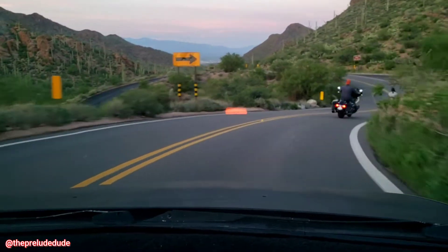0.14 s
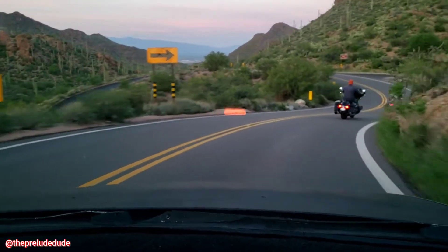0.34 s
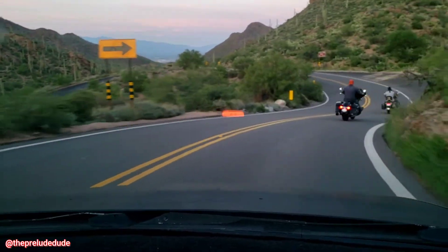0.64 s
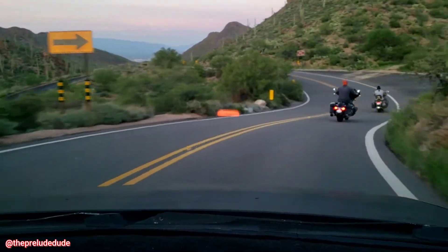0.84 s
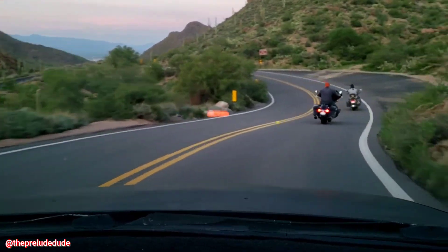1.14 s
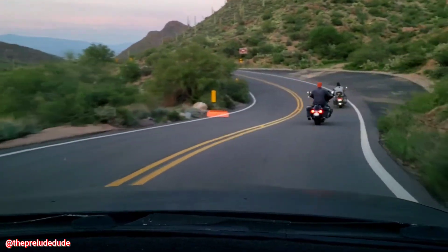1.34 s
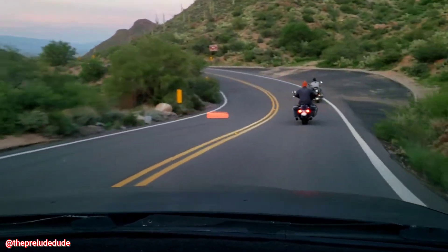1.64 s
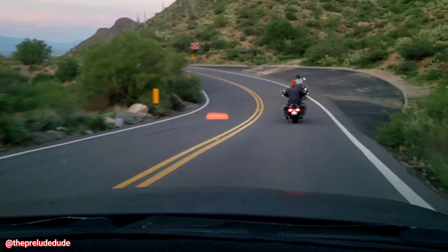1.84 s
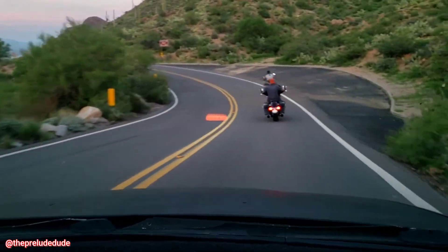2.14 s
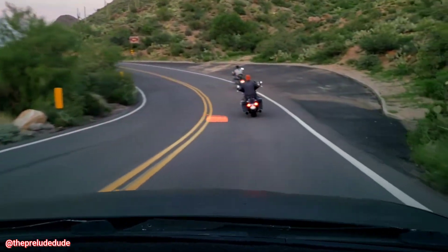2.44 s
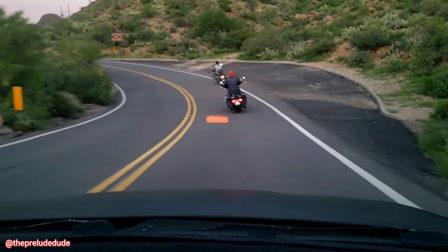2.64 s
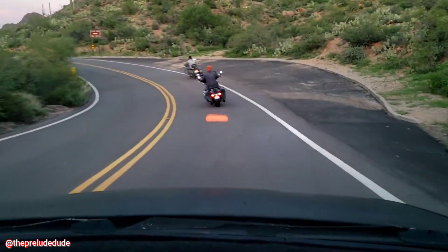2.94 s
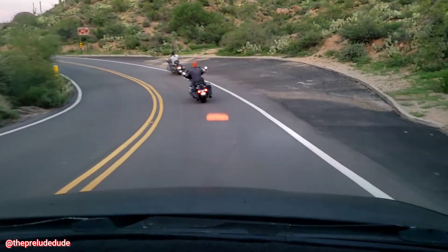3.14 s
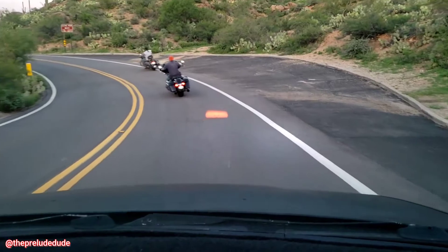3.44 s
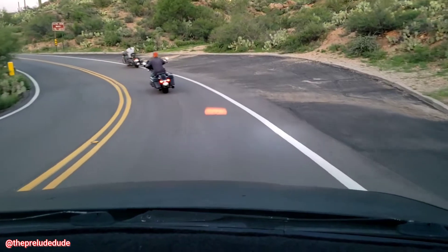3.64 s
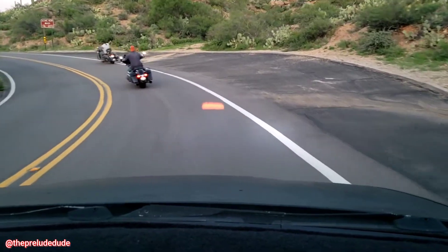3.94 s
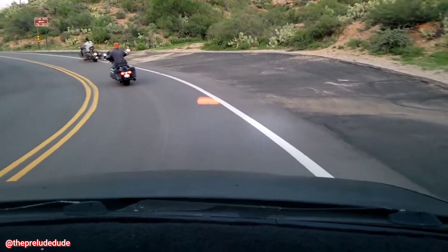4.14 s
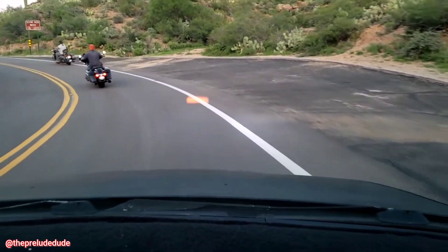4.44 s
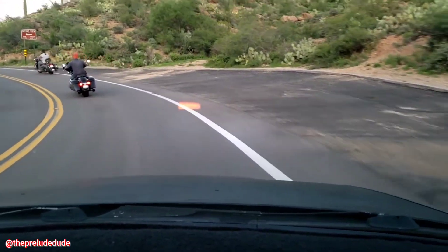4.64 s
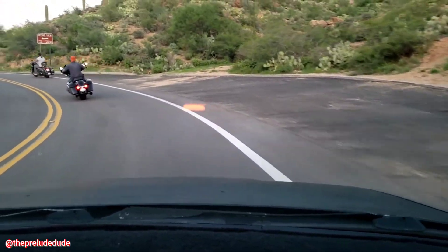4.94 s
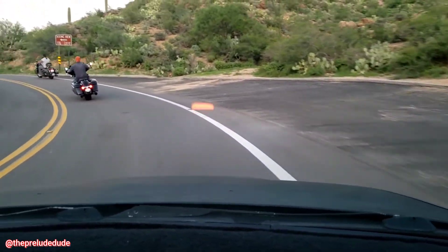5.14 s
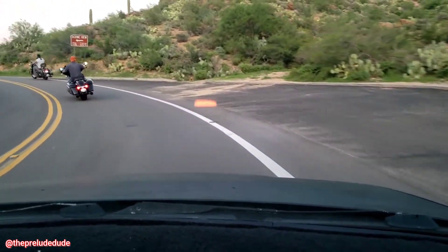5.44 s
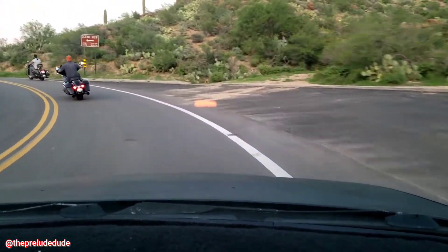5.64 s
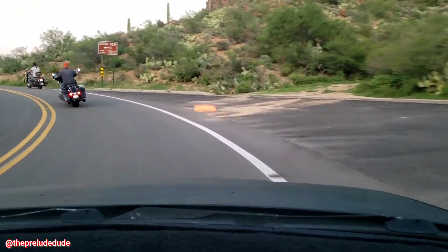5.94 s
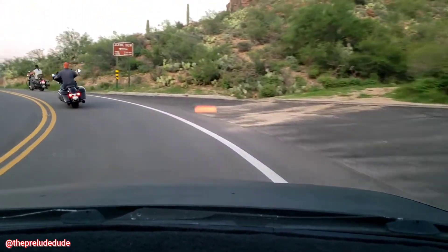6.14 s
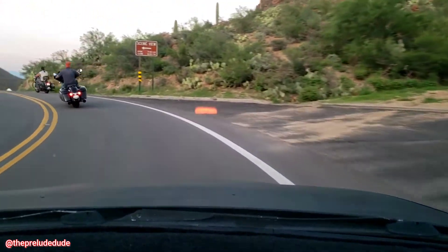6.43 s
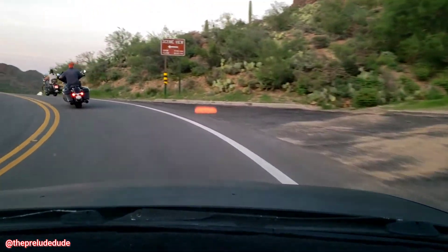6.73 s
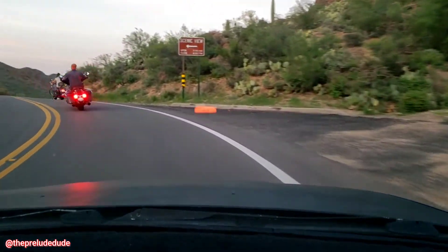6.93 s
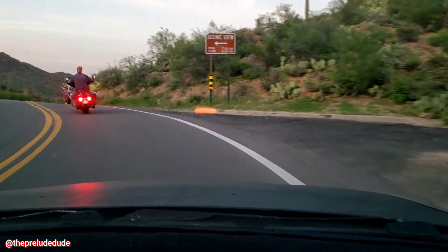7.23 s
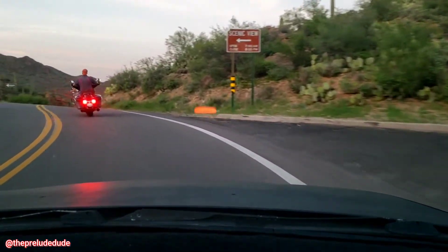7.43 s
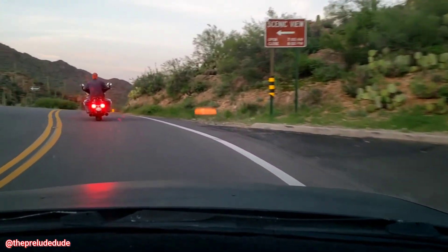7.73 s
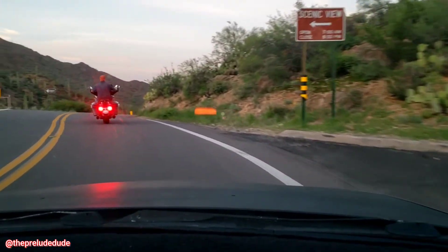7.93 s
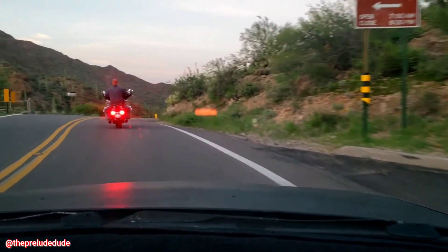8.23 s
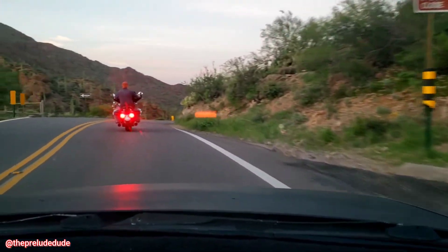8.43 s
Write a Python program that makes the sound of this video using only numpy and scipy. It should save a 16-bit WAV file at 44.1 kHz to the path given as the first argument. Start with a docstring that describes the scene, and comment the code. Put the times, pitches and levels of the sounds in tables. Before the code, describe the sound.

Heard from the dashboard of a moving car, a deep engine boom swells and eases as the car slows, picks up a little and slows again. Under it run steady road rumble, tyre roar and a soft rush of air. Two motorcycles drone faintly ahead, blending into the low sound, while plastic trim gives a few small ticks and squeaks.

```python
"""Inside a four-cylinder car that rolls through mountain bends, slowing and picking up again.
The exhaust booms at the firing rate, and its upper harmonics growl as they slide through resonances.
Under it lies a bed of road rumble, tyre roar, tyre hum and rushing air. Two motorcycles drone ahead.
Plastic trim ticks and squeaks, grit crackles, a small bird chirps faintly and a thin whine creeps in."""
import sys
import numpy as np
from scipy import signal
from scipy.fft import rfft, irfft, next_fast_len
from scipy.io import wavfile
from scipy.ndimage import uniform_filter1d

SR = 44100
rng = np.random.default_rng(int(sys.argv[2]) if len(sys.argv) > 2 else 0)


def to_wav(s):
    """Save 16-bit WAV."""
    ch = np.atleast_2d(s).T  # columns
    pcm = np.round(np.clip(ch, -1, 1) * 32767)  # PCM
    wavfile.write(sys.argv[1], SR, pcm.astype(np.int16))


N = 378372
TIME = np.arange(N) / SR


def undb(db):
    """Decibels to gain."""
    return 10 ** (np.asarray(db) / 20)


def unit(x):
    """Scale to an rms of one."""
    return x / np.sqrt(np.mean(x ** 2))


def curves(table):
    """One automation curve for each column after the time, in straight lines."""
    times, *columns = np.transpose(table)
    return [np.interp(TIME, times, column) for column in columns]


def ramp(start, length):
    """Fade from zero to one over length seconds."""
    return np.clip((TIME - start) / length, 0, 1)


def swell(start, length):
    """One rounded rise and fall."""
    return np.sin(np.pi * ramp(start, length))


def noise():
    """White noise."""
    return rng.standard_normal(N)


def wander(rate):
    """Smooth random modulation at an rms of one, with rate new values a second."""
    hold = max(int(SR / rate), 1)
    steps = rng.standard_normal(2048)[np.arange(N) // hold % 2048]
    return unit(uniform_filter1d(uniform_filter1d(steps, hold), hold))


def equalise(x, points):
    """Shape a sound with an EQ curve that falls 20 dB an octave past its ends; rms one."""
    hz, db = np.transpose(points)
    size = next_fast_len(N)
    bins = np.maximum(np.fft.rfftfreq(size, 1 / SR), 1)
    octaves_outside = np.maximum(np.log2(bins / hz[-1]), 0) + np.maximum(np.log2(hz[0] / bins), 0)
    gain = undb(np.interp(np.log(bins), np.log(hz), db) - 20 * octaves_outside)
    return unit(irfft(rfft(x, size) * gain, size)[:N])


def phase_of(hz):
    """Running phase of a gliding pitch."""
    return 2 * np.pi * np.cumsum(hz) / SR


def partial(phase, rough, rate):
    """A tone of rms near one whose strength and timing shake by the share rough."""
    tone = (1 + rough * wander(rate)) * np.cos(phase)
    jitter = rough * wander(rate) * np.sin(phase)
    return np.sqrt(2 / (1 + 2 * rough ** 2)) * (tone + jitter)


def resonance(x, hz, width):
    """One mode, gain one at its centre."""
    return signal.lfilter(*signal.iirpeak(hz, hz / width, fs=SR), x)


def add(out, start, sound):
    """Mix a short sound in at start seconds."""
    first = int(start * SR)
    out[first:first + len(sound)] += sound[:N - first]


# cabin and panel resonances: (centre [Hz], width [Hz], level against the direct sound [dB])
CABIN_MODES = [(411, 38, 3.5), (560, 58, -0.5), (605, 59, 0.5), (744, 16, -10.5), (985, 76, -9),
               (1065, 58, 3.5), (1204, 55, 1.5), (1369, 22, 0), (1495, 60, -5), (1693, 46, -3),
               (1877, 66, -1.5), (2015, 28, -0.5), (2570, 150, -10.5), (2920, 150, -13), (3570, 130, -6),
               (3940, 100, -11), (4170, 49, -5.5)]
def cabin(x):
    """The resonances of the cabin colour whatever passes through; rms one."""
    return unit(x + sum(undb(db) * resonance(x, hz, width) for hz, width, db in CABIN_MODES))


def whine(hz=3600, level_db=-84.5):
    """A thin, unsteady tone fades in late, barely there."""
    fade_in = ramp(start=5.79, length=.5)
    return undb(level_db) * fade_in * partial(2 * np.pi * hz * TIME, rough=.6, rate=45)


# roadside bird calls: (time [s], level [dB])
BIRD_CALLS = [(4.703, -75), (5.075, -73), (5.405, -71), (5.713, -63.5)]
def bird(top_hz=5030, fall_hz=280, spread_hz=35, length_s=0.0228, spacing_s=.039):
    """Three quick arched whistles a call, each peaking early at a slightly different pitch."""
    out = np.zeros(N)
    along = np.linspace(0, 1, int(length_s * SR))
    arch_hz = top_hz - fall_hz * ((3 * along - 1) / 2) ** 2
    envelope = np.sin(np.pi * along)
    for start, db in BIRD_CALLS:
        for chirp in range(3):
            hz = arch_hz + spread_hz * rng.standard_normal()
            add(out, start + chirp * spacing_s, undb(db) * envelope * np.sin(phase_of(hz)))
    return out


# crisp crunch of loose stones: (frequency [Hz], gain [dB])
GRIT_EQ = [(1800, -12), (2600, 4), (4200, 1), (5500, -10)]
def grit(level_db=-76, grains_per_s=260, scatter_db=4):
    """Small stones crackle under the treads beside a lay-by."""
    hits = rng.random(N) < grains_per_s / SR
    grains = hits * undb(scatter_db * noise()) * np.sign(noise())
    gate = ramp(start=3.95, length=0.18) * (1 - ramp(start=5.9, length=0.18))
    return undb(level_db) * gate * cabin(equalise(grains, GRIT_EQ))


# trim squeaks: (time [s], pitch [Hz], length [s], level [dB])
SQUEAKS = [(3.402, 6660, 0.048, -75), (5.17, 6150, .1, -78), (7.219, 2980, 0.064, -67),
           (7.255, 2000, .035, -59), (7.34, 3000, 0.038, -71)]
# trim rustles: (time [s], length [s], level [dB])
RUSTLES = [(2.72, .09, -70), (2.797, .06, -73), (4.4, .035, -79), (4.48, .035, -77), (4.55, .04, -80),
           (6.045, .45, -73), (6.695, .35, -76), (7.25, .14, -71)]
# their thin, bright top: (frequency [Hz], gain [dB])
RUSTLE_EQ = [(7000, -13), (10500, -5.5), (13000, -1), (15500, -3)]
def trim_creaks(width_hz=400):
    """Trim rubs as the body flexes: narrow, scratchy squeaks and thin rustles."""
    squeaks = np.zeros(N)
    for start, hz, length, db in SQUEAKS:
        band = resonance(noise(), hz, width_hz)
        squeaks += undb(db) * swell(start, length) * unit(resonance(band, hz, width_hz))
    rubbing = sum(undb(db) * swell(start, length) for start, length, db in RUSTLES)
    friction = noise() * undb(1.5 * wander(120))
    return squeaks + rubbing * equalise(friction, RUSTLE_EQ)


# trim slips: (time [s], relative level [dB], time to fall 60 dB [s], hardness as treble gain [dB])
TICKS = [(1.547, -38, 0.032, 3), (1.93, -33, 0.03, -7), (3.205, -29.5, 0.08, -22), (3.209, -43, 0.13, -1.5),
         (3.228, -49, 0.07, 2), (3.775, -49, .03, 7.5), (4.029, -42, 0.045, -2), (4.324, -45, 0.033, -1),
         (4.855, -43, .035, 2), (4.945, -49, 0.039, 7), (5.134, -46, 0.039, 6), (5.189, -40, 0.035, 1),
         (6.548, -44, 0.029, 4), (6.684, -42, 0.041, 10), (6.812, -39, .05, 2), (7.147, -43, 0.026, 6),
         (7.785, -46, 0.1, 8.5)]
# ring of the plastic: (centre [Hz], width [Hz], gain [dB])
PLASTIC_MODES = [(1200, 220, 1.5), (1620, 210, 6), (2665, 260, -4.5), (3660, 270, -1.5), (4400, 670, -7.5),
                 (7900, 3500, -15)]
def trim_ticks(gain_db=-8, treble_hz=2500, lowpass_hz=9000):
    """Plastic panels slip: a short scrape rings their modes, the high ones more when it is hard."""
    out = np.zeros(N)
    age = TIME[:SR // 4]
    lowpass = signal.butter(2, lowpass_hz, fs=SR)
    for start, db, decay_s, hard_db in TICKS:
        scrape = signal.lfilter(*lowpass, rng.standard_normal(len(age)))
        slip = undb(db + gain_db) * scrape * undb(-60 * age / decay_s)
        for hz, width, mode_db in PLASTIC_MODES:
            gain = undb(mode_db + hard_db * (hz > treble_hz))
            add(out, start, gain * resonance(slip, hz, width))
    return out


# fader rides for air flow and road contact: (time [s], air fader [dB], roar fader [dB])
ROAD_FADERS = [(0, -50.5, -45.5), (0.6, -54.5, -48.5), (1, -57.5, -50.5), (2.1, -59.5, -51.5),
               (2.6, -63, -54), (2.9, -63.5, -55), (3.17, -64, -53.5), (3.45, -67.5, -58.5),
               (3.7, -66, -55.5), (4.1, -66, -55), (5.2, -65, -54.5), (6.1, -63.5, -54),
               (6.85, -60.5, -51.5), (7.35, -60.5, -52), (8.05, -65.6, -54), (8.54, -68, -59.5)]
# body of the air rush: (frequency [Hz], gain [dB])
RUSH_EQ = [(1200, -20), (2200, 3), (2900, -0.5), (3700, -1), (4500, -4.5), (5100, -4.5), (5800, -13.5),
           (7000, -12.5), (10000, -36.5)]
# hiss on top of it: (frequency [Hz], gain [dB])
HISS_EQ = [(3500, -24), (5500, -2.5), (7000, -3), (7600, 1), (9000, 0.5), (12000, -0.5), (13500, -3),
           (15500, -5)]
def air(rush_gain_db=-4, hiss_gain_db=-8):
    """Air rushes past the window and flutters; fine road grit roughens the rush."""
    air_db, _ = curves(ROAD_FADERS)
    flutter = wander(22)
    grainy = noise() * undb(0.72 * wander(200))
    rush = undb(air_db + rush_gain_db + 0.65 * flutter) * cabin(equalise(grainy, RUSH_EQ))
    hiss_db = air_db + hiss_gain_db + .5 * flutter + 0.35 * wander(30)
    return rush + undb(hiss_db) * equalise(noise(), HISS_EQ)


# midrange roar of tread on asphalt: (frequency [Hz], gain [dB])
ROAR_EQ = [(150, -11.5), (300, 6.5), (450, 1), (600, -2.5), (720, -2.5), (900, -0.5), (1000, -12),
           (1500, -8.5), (1950, -14), (2400, -23.5), (4000, -36)]
def tyre_roar(gain_db=3):
    """The treads roar on the road, heard through the cabin's resonances."""
    _, roar_db = curves(ROAD_FADERS)
    return undb(roar_db + gain_db + 0.63 * wander(14)) * cabin(equalise(noise(), ROAR_EQ))


def tyre_hum(cruise_hum_hz=255.4, cruise_firing_hz=67.5, loud_hum_db=-46, loud_boom_db=-17.5):
    """The tyres hum at a pitch that follows speed, swelling with the exhaust boom."""
    firing_hz, = curves(FIRING_RATE)
    boom_db, = curves(BOOM_LEVEL)
    hum_hz = cruise_hum_hz + 1.05 * (firing_hz - cruise_firing_hz)
    hum_db = loud_hum_db + 0.47 * (boom_db - loud_boom_db)
    return undb(hum_db) * partial(phase_of(hum_hz), rough=0.12, rate=8)


# two motorcycles ahead, faint through the windscreen: (time [s], pitch [Hz], level [dB])
NEAR_BIKE = [(1.5, 69.9, -72), (2.7, 66.5, -55), (4, 61.65, -44), (5, 58.64, -43.5), (5.6, 56.68, -45.5),
             (6.8, 55.96, -46.5), (7.5, 55.15, -47.5), (8.58, 54.8, -49.5)]
FAR_BIKE = [(1, 65, -66), (2.5, 60.2, -48), (3.3, 57.05, -48.5), (4.5, 53.42, -49.5), (5.3, 52.4, -73)]
# their exhaust tone: (harmonic [x pitch], relative level [dB])
BIKE_HARMONICS = [(1, 7.5), (2, -11), (3, -4.5), (4, -5), (5, -9), (7, -4)]
def motorcycle(ride):
    """A bike's drone sinks as it slows for the bend; its lowest note beats against the boom."""
    hz, level_db = curves(ride)
    phase = phase_of(hz)
    drone = sum(undb(db) * partial(k * phase, rough=0.22, rate=11) for k, db in BIKE_HARMONICS)
    return undb(level_db) * unit(drone)


# deep rumble of the cabin: (frequency [Hz], gain [dB])
RUMBLE_EQ = [(15, -20.5), (30, -17.5), (42, -6.5), (54, 0.5), (65, 0.5), (76, -3.5), (88, 5), (100, -9.5),
             (120, -24.5), (160, -33.5), (300, -57.5)]
# low-mid shudder of the body panels: (frequency [Hz], gain [dB])
PANEL_EQ = [(70, -25), (110, 1), (150, 4.5), (195, -5.5), (245, 2), (310, -1.5), (420, -10), (520, -13),
            (620, -18.5), (800, -22), (1500, -57.5)]
def road_rumble(smooth_db=-36, rough_boost_db=3.5, cruise_panel_db=-45, cruise_roar_db=-53.5):
    """Asphalt shakes the body, harder once it turns rough; the panels follow the tyre roar."""
    _, roar_db = curves(ROAD_FADERS)
    rough_road = ramp(start=5.11, length=0.95)
    rumble = undb(smooth_db + rough_boost_db * rough_road) * equalise(noise(), RUMBLE_EQ)
    panel_db = cruise_panel_db + .5 * (roar_db - cruise_roar_db) + 0.79 * wander(6.5)
    return rumble + undb(panel_db) * equalise(noise(), PANEL_EQ)


def overtone(hz, modes, floor_db, rough, rate):
    """A shaky harmonic that flares above floor_db as its pitch slides through resonances."""
    peaks = [undb(db) / (1 + (2 * (hz - centre) / width) ** 2) for centre, width, db in modes]
    gain = np.sqrt(undb(floor_db) ** 2 + sum(peak ** 2 for peak in peaks))
    return gain * partial(phase_of(hz) + rng.uniform(0, 2 * np.pi), rough, rate)


# growl harmonics, the halves from the crank turn: (order [x firing rate], relative level [dB])
GROWL_ORDERS = [(3.5, -6), (4, 1.5), (4.5, -4.5), (5, -3), (5.5, -9.5), (6, 0.5), (6.5, -9), (7, -4),
                (8, -7), (9, -13.5), (10, -16), (12, -18.5)]
# fader ride of the growl, dying away as the car coasts: (time [s], level [dB])
GROWL_FADER = [(0, -57), (0.2, -54.5), (0.58, -50.5), (0.95, -57.5), (1.3, -52.5), (1.6, -53.5),
               (1.85, -59.5), (2.12, -56), (2.6, -63), (3.15, -58), (4.0, -61), (4.6, -68), (5.5, -66.5),
               (6.8, -60.5), (7.6, -66.5), (8.58, -69)]
# panel resonances that make it flare: (centre [Hz], width [Hz], peak against the floor [dB])
GROWL_MODES = [(286.4, 22, 8), (346, 16, 2), (386.3, 13, 5), (406, 24, 8.5), (429, 13, 5.5), (475.8, 9, 6),
               (511, 11, 5), (533.7, 17, 4), (609.5, 16, 10.5)]
def engine_growl(flicker_db=1.87):
    """Uneven combustion shakes the higher orders, which light up as they cross panel resonances."""
    firing_hz, = curves(FIRING_RATE)
    fader_db, = curves(GROWL_FADER)
    growl = np.zeros(N)
    for order, db in GROWL_ORDERS:
        gain = undb(db + flicker_db * wander(6))
        growl += gain * overtone(order * firing_hz, GROWL_MODES, floor_db=0, rough=0.38, rate=26)
    return undb(fader_db) * growl


# engine speed: (time [s], firing rate [Hz])
FIRING_RATE = [(0, 90.2), (.5, 86.1), (1, 81.4), (1.5, 77.1), (2, 72.7), (2.8, 66.5), (4, 69.5),
               (5.3, 74.3), (6, 75.4), (6.8, 75.5), (7.5, 72.5), (8.58, 65.4)]
# weight of the boom, following the throttle: (time [s], level [dB])
BOOM_LEVEL = [(0, -31.5), (0.35, -22), (0.8, -22), (0.94, -31.5), (1.22, -34.5), (1.4, -28), (1.95, -25),
              (2.33, -18.5), (2.93, -20.5), (3.94, -18), (4.08, -24.5), (4.28, -22), (4.45, -29.5),
              (5.3, -31.5), (6.35, -31.5), (7.05, -24), (8.15, -19), (8.58, -21)]
# body resonances under harmonics two and three: (centre [Hz], width [Hz], peak before lift-off [dB])
BOOM_MODES = [(165.26, 14.3, -33), (220.3, 11, -51), (240.7, 20, -42), (258.8, 14, -39.5)]
def exhaust_boom(lift_second_db=5, lift_third_db=-11):
    """A clean boom at the firing rate; as the throttle closes, harmonic two grows and three sinks."""
    firing_hz, = curves(FIRING_RATE)
    boom_db, = curves(BOOM_LEVEL)
    boom = undb(boom_db) * np.sqrt(2) * np.sin(phase_of(firing_hz))
    second = overtone(2 * firing_hz, BOOM_MODES, floor_db=-59, rough=0.059, rate=14)
    third = overtone(3 * firing_hz, BOOM_MODES, floor_db=-73.5, rough=0.26, rate=13)
    lift_off = ramp(start=6.8, length=.25)
    return boom + second * undb(lift_second_db * lift_off) + third * undb(lift_third_db * lift_off)


def scene():
    """The mono mix, as heard at the dashboard."""
    bikes = motorcycle(NEAR_BIKE) + motorcycle(FAR_BIKE)
    engine = exhaust_boom() + engine_growl()
    bed = road_rumble() + tyre_roar() + tyre_hum() + air()
    details = trim_ticks() + bird() + trim_creaks() + grit() + whine()
    return (details + bed + bikes + engine)[None]


def record(dry, top_hz=15500):
    """A steep low-pass takes off the top of the treble."""
    return signal.sosfilt(signal.ellip(10, .1, 80, top_hz, fs=SR, output="sos"), dry)


dry = scene()
out = record(dry)
to_wav(out)
```